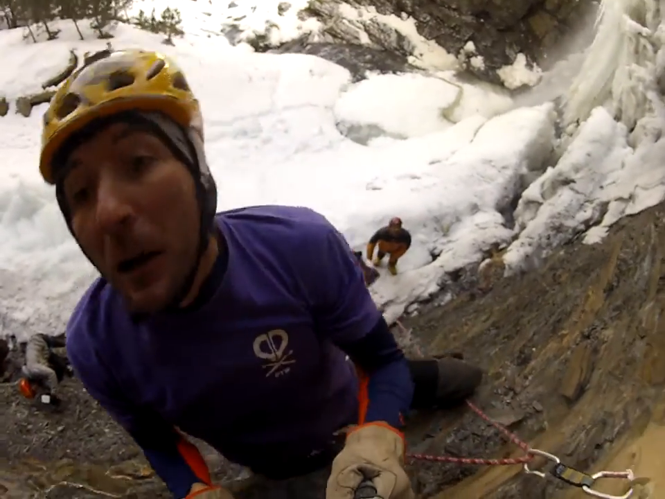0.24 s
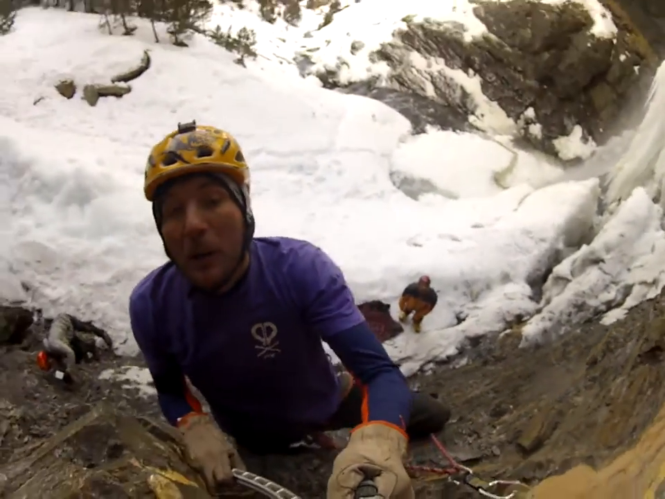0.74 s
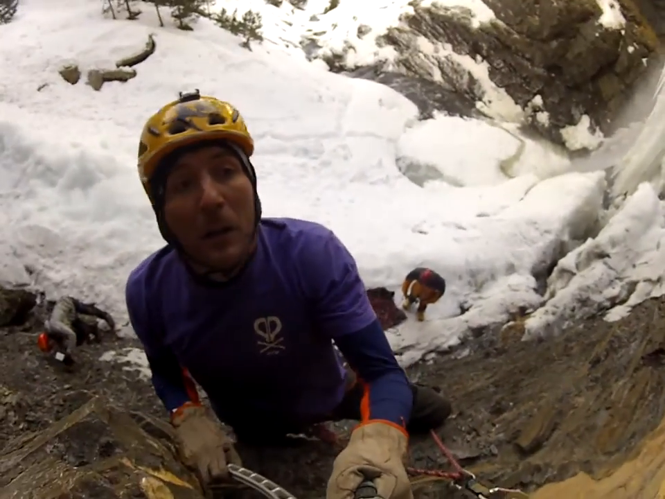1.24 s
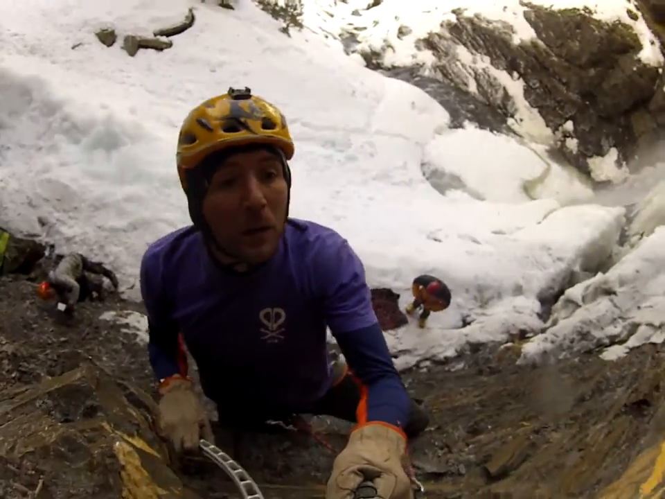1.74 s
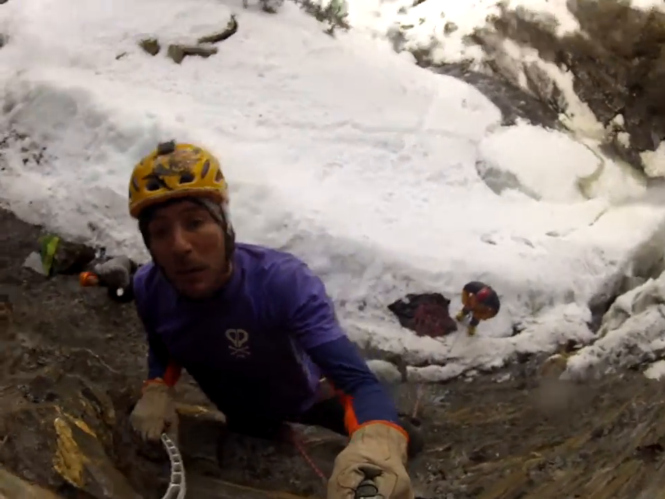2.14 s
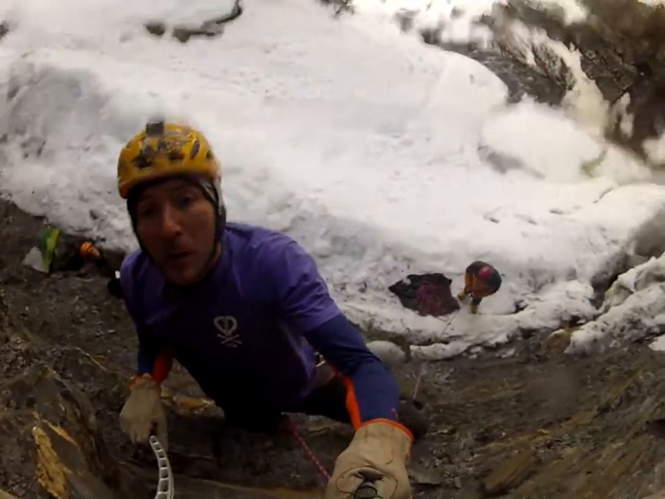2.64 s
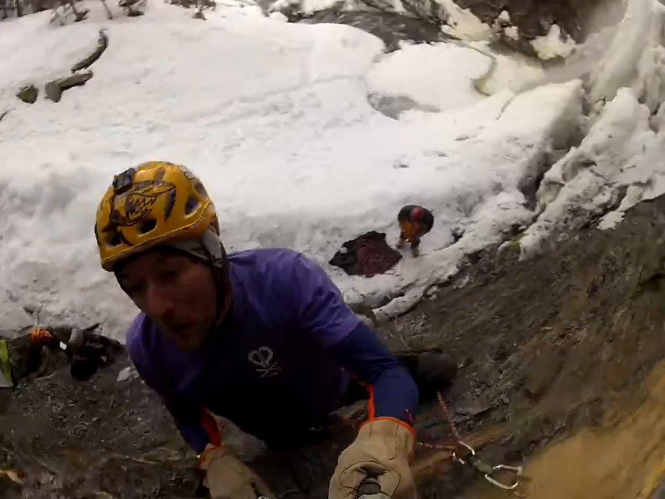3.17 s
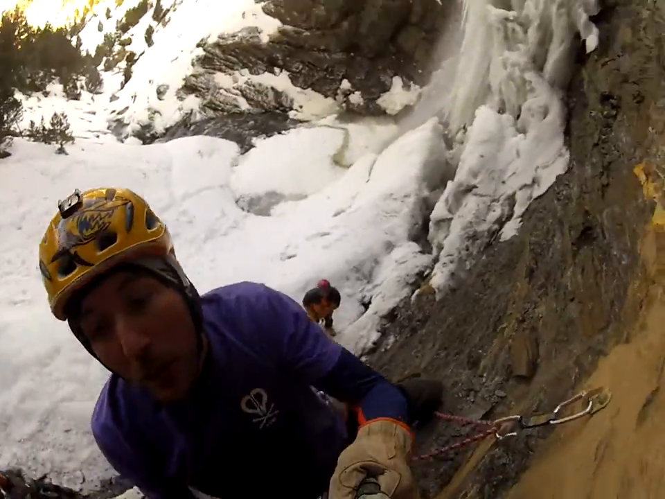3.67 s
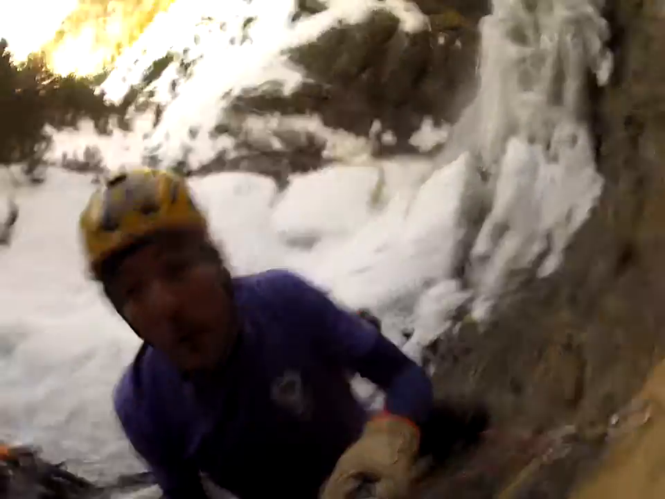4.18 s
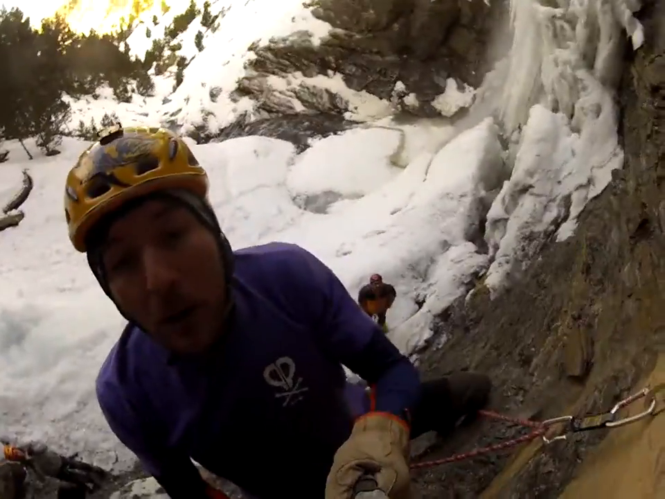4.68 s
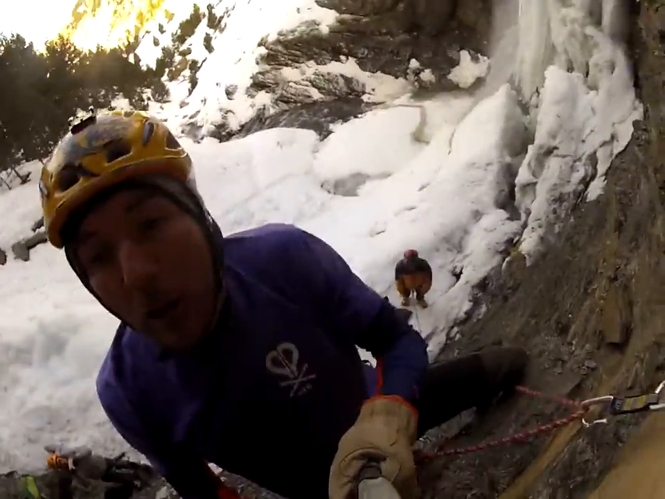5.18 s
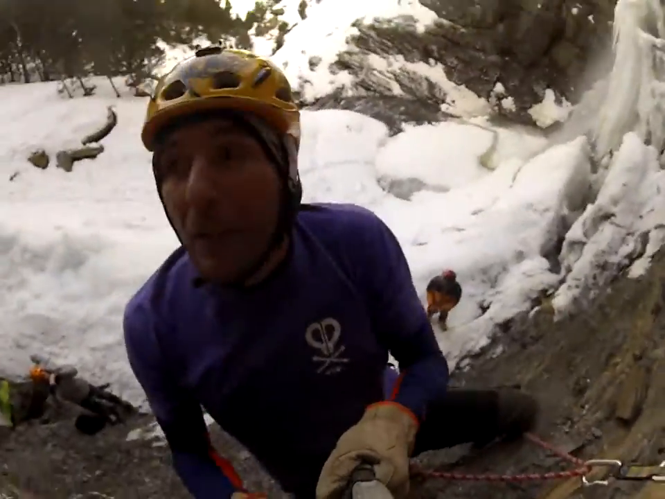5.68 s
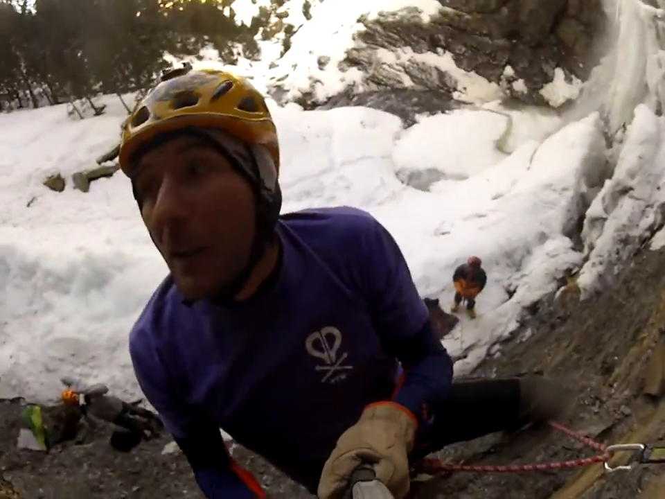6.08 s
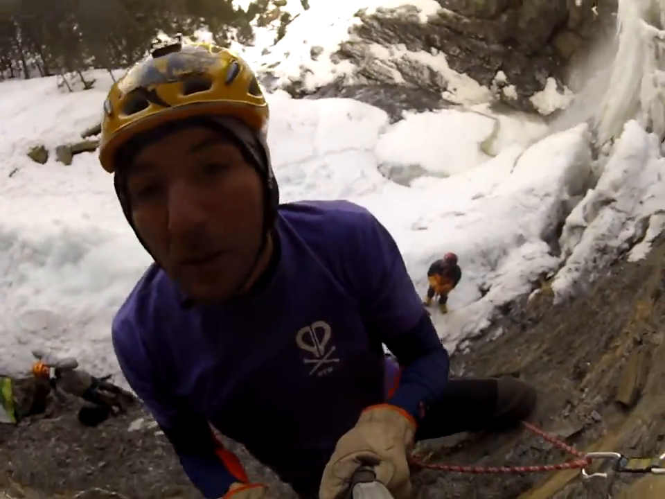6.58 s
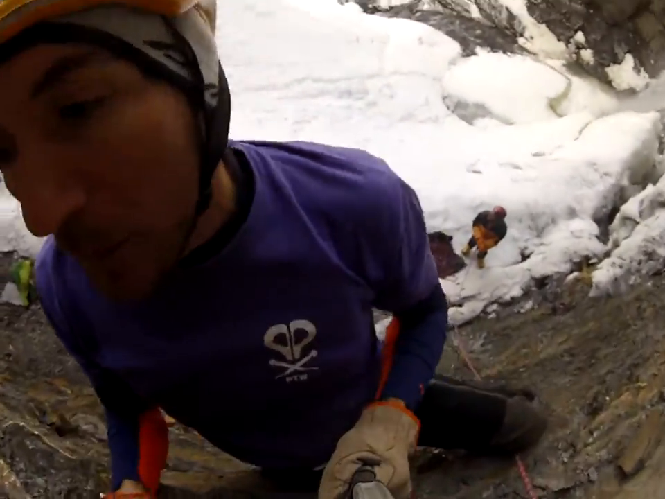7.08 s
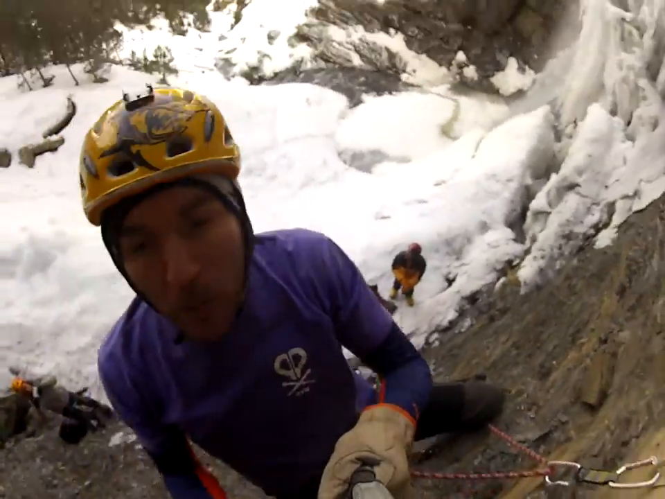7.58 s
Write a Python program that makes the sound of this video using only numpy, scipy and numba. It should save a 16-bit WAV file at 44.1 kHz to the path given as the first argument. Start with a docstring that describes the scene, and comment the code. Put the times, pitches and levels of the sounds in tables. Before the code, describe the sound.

Outdoors, metal picks bite and scratch across stone with hollow shaft knocks and thin pings, the constant hiss dipping after loud blows.

```python
"""A steady outdoor hiss comes first, soon joined by steel ice tools that skid, bite and scrape on rock.
They are heard through the shaft of a tool that carries the camera: stick-slip snaps excite resonances of
steel and shaft, while clinks, knocks, sways, pings and twangs are freely decaying sine vibrations.
The recorder overloads on loud blows and ducks the hiss after them; its held coarse samples add a gritty fizz."""
import sys
import numpy as np
from scipy import signal
from scipy.fft import rfft, irfft, next_fast_len
from scipy.io import wavfile
from scipy.ndimage import uniform_filter1d
from numba import njit

SR = 44100
rng = np.random.default_rng(int(sys.argv[2]) if len(sys.argv) > 2 else 0)


def pcm_store(signal):
    """Save signal as 16-bit PCM."""
    levels = np.round(np.clip(np.atleast_2d(signal), -1, 1) * 32767)
    wavfile.write(sys.argv[1], SR, levels.astype(np.int16).T)


N = 344862


def gain_of(db):
    """Logarithmic level: decibels to an amplitude ratio."""
    return 10 ** (np.asarray(db) / 20)


def evened(x):
    """Normalisation of power: scales a signal to rms 1."""
    return x / np.sqrt(np.mean(x ** 2) + 1e-20)


def add(mix, s, sound):
    """Linear superposition: adds a sound into the mix, in place, from time s."""
    part = mix[max(round(s * SR), 0):][:len(sound)]
    part += sound[:len(part)]


def hiss():
    """Stationary noise: white noise shaped by a fixed spectrum, its level wavering slightly."""
    # spectrum of the outdoor hiss: f/Hz, relative level per Hz/dB
    spectrum = [(15, -19), (25, -8.5), (59, -6), (119, -4.5), (151, -1), (182, -5.5), (296, -4), (358, -7),
                (433, -3), (482, -4), (595, 0), (988, -16), (2840, -7.5), (3290, -10), (3900, -18.5),
                (5070, -60.5), (8580, -120)]
    level_db, waver_db, waver_samples = -39.58, 0.6, SR // 5
    hz = np.fft.rfftfreq(N, 1 / SR)
    points_hz, points_db = np.transpose(spectrum)
    shape_db = np.interp(np.log(hz + 1), np.log(points_hz), points_db)
    noise = irfft(rfft(rng.standard_normal(N)) * gain_of(shape_db), N)
    waver = evened(uniform_filter1d(rng.standard_normal(N), waver_samples))
    return gain_of(level_db + waver_db * waver) * evened(noise)


def contact(t, rise, length, release_db_per_s, unloaded_db=30, rattle_db=-33, rattle_db_per_s=350):
    """Contact force in dB: it loads up to 0 dB, holds until time length, lets go and rattles on faintly."""
    since = t - length
    loading = unloaded_db * (t / rise - 1)
    release = -release_db_per_s * since
    rattle = rattle_db - rattle_db_per_s * since
    letting_go = np.maximum(release, rattle)
    return np.minimum(np.minimum(loading, letting_go), 0)


def skids(t):
    """Sliding friction under changing pressure, with chatter; yields (s, grit dB, thud dB, sharpness)."""
    # skids over the rock: t/s when loaded, length/s, grit level at start/dB, at end/dB (before the
    # grit offset), thud level above those/dB (before the thud offset), edge sharpness/(dB per octave)
    skid_table = [(0.064, 0.065, -41, -44, -5, -7), (0.249, 0.02, -25.5, -26, -6.5, 0.5),
                  (0.864, 0.107, -6.5, -12.5, -3, -1), (0.969, 0.051, 6, 2, -3.5, 1),
                  (2.177, 0.028, 1, -2, -2.5, -5.5), (2.234, 0.023, 6.5, 6.5, -5.5, -3.5),
                  (2.452, 0.01, 5, -5.5, 2, 1), (2.552, 0.036, -6.5, -14, 1, -3.5),
                  (2.703, 0.032, -7.5, 3.5, 1, -1), (2.744, 0.037, -7, -13.5, 5.5, -3.5),
                  (3.036, 0.042, -26, 15, -14, 3), (3.088, 0.03, 7, -21, 2, 3),
                  (3.985, 0.053, -16.5, -28, 6.5, -4), (4.087, 0.031, -1.5, 12.5, -9.5, 4.5),
                  (4.181, 0.083, -7.5, -0.5, -3, 1), (4.26, 0.089, 4.5, 4.5, -2.5, 0.5),
                  (4.612, 0.09, -13, -15.5, -7.5, -1), (4.726, 0.033, -13, 5.5, -1, 1),
                  (4.864, 0.021, -30, -26, -4, 1), (4.95, 0.028, -21, 3, -10, 1),
                  (5.063, 0.015, 7.5, -9.5, -2, 3), (5.128, 0.058, -14, -19.5, 1, -1),
                  (5.228, 0.042, -12, -16, 2.5, 0), (5.41, 0.029, -23, 3, 0, -3),
                  (5.463, 0.012, -7.5, -10.5, 8, -3), (6.674, 0.025, -26, -17.5, -8, 4)]
    grit_offset_db, thud_offset_db = 0.53, -1.94
    rise_s, release_db_per_s = 0.01, 1201
    hop_s, chatter_db = 0.021, 2  # the tool catches again at this interval and eases by this much in between
    sliding = t - rise_s
    chatter = chatter_db * (sliding / hop_s % 1)
    for s, length, start_db, end_db, weight_db, sharpness in skid_table:
        pressure = np.interp(sliding, [0, length], [start_db, end_db]) - chatter
        force = pressure + contact(t, rise_s, rise_s + length, release_db_per_s)
        yield s - rise_s, force + grit_offset_db, force + weight_db + thud_offset_db, sharpness


def bites(t):
    """Impulsive contact: one brief force shape for every bite; yields (s, grit dB, thud dB, sharpness)."""
    # the steel catches in one short clack: t/s, grit level before the offset/dB, thud level/dB,
    # edge sharpness/(dB per octave)
    bite_table = [(0.8448, -3, -13.5, -4), (0.8714, 8, 2, 4), (0.9784, 11, 10, 5), (1.008, 8.5, 5, -6),
                  (1.017, 7.5, -1, 3), (1.321, -40, -24.5, 2), (2.1593, -4, -7.5, -2),
                  (2.187, 10.5, -2, -5), (2.2077, 5.5, 4, -10), (2.4423, -1.5, 2, 1), (2.534, 1, 13, 2.5),
                  (2.71, 10, -2, -5), (2.7233, 0.5, 15, 4), (3.0758, 13.5, 5, -2), (3.9603, 1, -5.5, 5),
                  (4.145, 10.5, 11, 8), (4.1561, 11.5, 3, 0), (4.187, 3, -8, 5), (4.228, -2, -15, 10),
                  (4.25, 12.5, 11.5, 5.5), (4.2867, 6.5, 0, 6), (4.385, -7, -30, 7.5),
                  (4.697, 11.5, 5.5, 3), (4.7398, 12, 3, 4), (4.9068, 10.5, 3, 4.5), (4.9316, -6, -8, 4),
                  (4.984, 8, 13.5, 5.5), (4.9985, 7, -16, 7), (5.0217, 3, -5, 3.5), (5.0477, 10, 7, 5),
                  (5.1028, 10.5, 6, 0.5), (5.114, 5.5, 3.5, 5.5), (5.1988, 4.5, -16, 1), (5.2052, 6, 9, -4),
                  (5.246, -8.5, -19, 4.5), (5.4343, 11, 7, -0.5), (5.4787, 11.5, 9.5, 2.5),
                  (5.504, -8.5, -6, -1), (6.095, -35, -34.5, 1)]
    grit_offset_db = 1.5
    force = contact(t, rise=0.0027, length=0.0084, release_db_per_s=2496)
    for s, grit_db, thud_db, sharpness in bite_table:
        yield s, force + grit_db + grit_offset_db, force + thud_db, sharpness


def slips(per_s, spread_db, bunch_db):
    """Stick-slip friction: tiny snaps of uneven size, bunched as steel jumps over the grains of the rock."""
    bunching = evened(uniform_filter1d(rng.standard_normal(N), size=160))
    spread = rng.standard_normal(N)
    size = gain_of(spread_db * np.clip(spread, -2, 2) + bunch_db * np.clip(bunching, -2, 2))
    sign = rng.choice([-1, 1], N)
    happens = rng.random(N) < per_s / SR
    return evened(size * sign * happens)


def ring(x, modes):
    """Modal resonance: shares a force among steep-sided peaks, one row per mode, their sum at rms 1."""
    size = next_fast_len(N)
    hz = np.fft.rfftfreq(size, 1 / SR)
    power = []
    for centre, width, db in modes:
        detuning = 2 * (hz - centre) / width
        power.append(gain_of(db) ** 2 / (1 + detuning ** 2) ** 2)
    power = np.array(power)
    # each mode takes its share of the summed response
    parts = irfft(rfft(x, size) * power / np.sqrt(power.sum(0)), size)[:, :N]
    return parts / np.std(parts.sum(0))


def scraping():
    """Forced resonance: contact snaps ring the steel and thump the shaft; overlapping contacts add in power."""
    # modes of the scraping steel: f/Hz, width/Hz, relative level/dB
    steel_modes = [(1149, 212, 4.5), (1290, 180, 0), (1702, 336, 5), (1935, 330, 2), (2490, 340, -4),
                   (2888, 230, 3.5), (3593, 240, -8.5)]
    # modes of the shaft under a blow: f/Hz, width/Hz, relative level/dB
    shaft_modes = [(83, 28, 5), (169, 240, -2.5), (298, 98, -16), (503.6, 53, 5), (703, 505, 0.5),
                   (720, 51, -1)]
    pivot_hz = 1750  # sharpness tilts the steel modes about this frequency
    t = np.arange(SR // 5) / SR
    grit_power, thud_power = np.zeros((len(steel_modes), N)), np.zeros(N)
    octaves = np.log2(np.array(steel_modes)[:, 0] / pivot_hz)
    for s, grit_db, thud_db, sharpness in [*skids(t), *bites(t)]:
        add(thud_power, s, gain_of(thud_db) ** 2)
        for mode_power, octave in zip(grit_power, octaves):
            # a sharp edge favours the high modes
            add(mode_power, s, gain_of(grit_db + sharpness * octave) ** 2)
    steel = np.sqrt(grit_power) * ring(slips(per_s=3000, spread_db=2.5, bunch_db=2.5), steel_modes)
    shaft = np.sqrt(thud_power) * ring(slips(per_s=3800, spread_db=2.0, bunch_db=3.0), shaft_modes)
    return steel.sum(0) + shaft.sum(0)


def tone(hz, db, t60, rise, drift=0):
    """Free damped vibration: a sine of rms level db, dying 60 dB in t60 s, its pitch drifting in Hz per s."""
    t = np.arange(int(t60 * SR)) / SR
    decay = np.sqrt(2) * gain_of(db - 60 * t / t60)
    onset = 1 - np.exp(-t / rise)
    cycles = (hz + drift * t / 2) * t
    return decay * onset * np.sin(2 * np.pi * cycles)


def clinks():
    """Free vibration of the steel after light, clean taps, as when the pick hops down the rock."""
    # taps: t/s, level/dB
    clink_table = [(0.8453, 1), (4.609, -0.5), (4.631, 0), (4.654, -4), (4.673, -3.5), (4.691, 10),
                   (4.698, 20.5), (5.021, 10)]
    out = np.zeros(N)
    for s, db in clink_table:
        add(out, s, tone(1694, db, t60=0.026, rise=0.0011))
    return out


def knocks():
    """Heavily damped vibration: square blows give the shaft a hollow knock."""
    # square blows: t/s, level/dB
    knock_table = [(0.854, 8), (2.162, 3), (2.446, 4.5), (2.536, 18.5), (2.728, 8), (3.966, -2.5),
                   (4.989, 15.5)]
    out = np.zeros(N)
    for s, db in knock_table:
        add(out, s, tone(506, db, t60=0.05, rise=0.0033))
    return out


def sways():
    """Free bending vibration: the shaft springs back and hums, its pitch set by grip and load, then sagging."""
    # releases of the shaft: t/s, f/Hz, level/dB, t60/s
    sway_table = [(0.862, 82, -7, 0.36), (.98, 63, -18.5, 1.5), (2.19, 78, -18.5, 0.55),
                  (2.442, 77, 9, 0.067), (2.461, 78, -18.5, 0.38), (2.739, 65.5, -29, 1.1),
                  (3.969, 66.3, -16.5, 0.8), (4.15, 76, -6, 0.34), (4.74, 74.7, -24, 1.4),
                  (4.918, 78.5, -17.5, 1.7), (5.207, 66.7, -35, 0.75), (5.479, 66.3, -12.5, 0.6)]
    out = np.zeros(N)
    for s, hz, db, t60 in sway_table:
        add(out, s, tone(hz, db, t60, rise=0.0098, drift=-2.6))
    return out


def pings():
    """Free vibration at high pitch: the pick slips free and rings thinly."""
    # slips of the pick: t/s, level/dB
    ping_table = [(2.195, -5.5), (2.452, -18.5), (3.08, -9), (4.122, -10), (4.636, -9.5), (4.70, -6),
                  (4.965, -13)]
    out = np.zeros(N)
    for s, db in ping_table:
        add(out, s, tone(3572, db, t60=0.12, rise=0.001))
    return out


def twangs():
    """A higher bending mode under rising load: its pitch climbs as weight comes onto the tool."""
    # twangs of the shaft: t/s, level/dB
    twang_table = [(2.221, -6), (3.091, -24), (3.969, -28)]
    out = np.zeros(N)
    for s, db in twang_table:
        add(out, s, tone(265, db, t60=0.32, rise=0.0088, drift=125))
    return out


def scene():
    """Linear superposition of hiss, scraping and free vibrations in one channel."""
    free_ringing = clinks() + knocks() + sways() + pings() + twangs()
    return (hiss() + scraping() + free_ringing)[None]


@njit
def gain_control(x, threshold, attack, recovery, deepest, hold, ceiling):
    """Feedback compression: clipped output peaks over the threshold pull the gain down; it creeps back."""
    out, peak, cut = np.zeros(len(x)), 0.0, 0.0  # cut is in dB
    for i in range(len(x)):
        ducked = x[i] * 10 ** (-cut / 20)
        out[i] = min(max(ducked, -ceiling), ceiling)
        peak = max(abs(out[i]), peak * hold)
        excess = max(peak - threshold, 0.0)
        cut = min(max(cut + attack * excess - recovery, 0.0), deepest)
    return out


def record(dry):
    """Sampling and imaging: coarse held samples mirror the sound into the treble, after duck and overload."""
    sample_hz, hold_hz, edge_hz = 8000, 32000, 15600
    threshold, ceiling, deepest_db, peak_hold_s = 0.05, 0.93, 22.5, 0.0094
    attack_db_per_s, recovery_db_per_s = 2050, 135  # attack is per unit of excess amplitude
    # the short resampling window lets some images through
    coarse = signal.resample_poly(dry[0], sample_hz, SR, window=("kaiser", 3))
    hold = np.exp(-1 / (peak_hold_s * sample_hz))
    attack, recovery = attack_db_per_s / sample_hz, recovery_db_per_s / sample_hz
    ducked = gain_control(coarse, threshold, attack, recovery, deepest_db, hold, ceiling)
    held = np.repeat(ducked, hold_hz // sample_hz)
    steps = signal.resample_poly(held, SR, hold_hz)[:N]
    lowpass = signal.firwin(201, edge_hz, window=("kaiser", 10), fs=SR)
    return signal.oaconvolve(steps, lowpass, "same")[None]


dry = scene()
out = record(dry)
pcm_store(out)
```